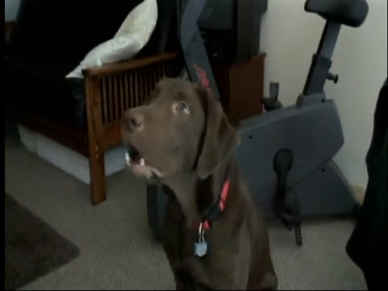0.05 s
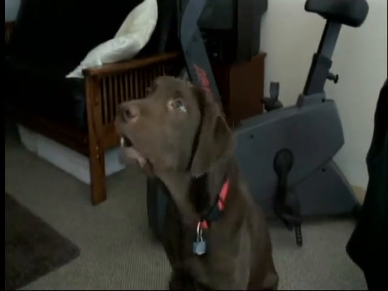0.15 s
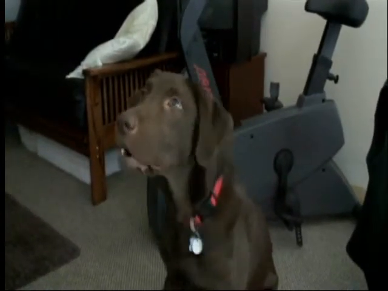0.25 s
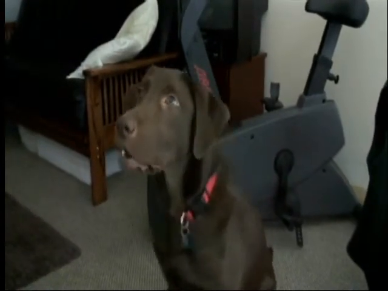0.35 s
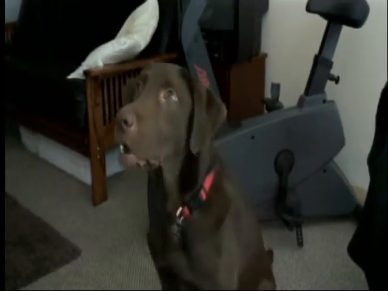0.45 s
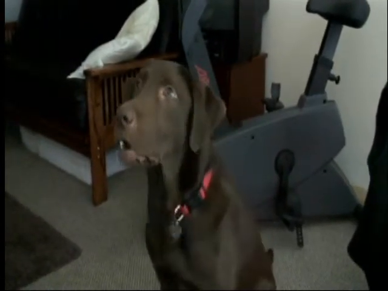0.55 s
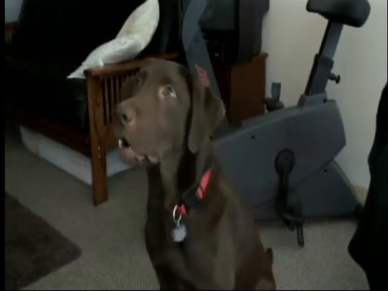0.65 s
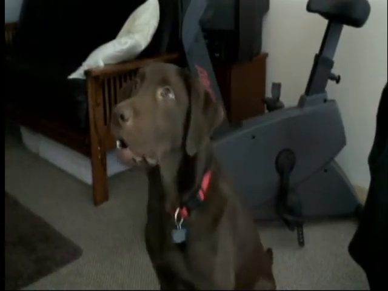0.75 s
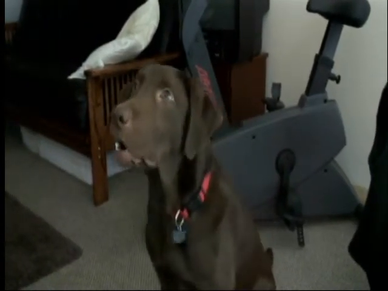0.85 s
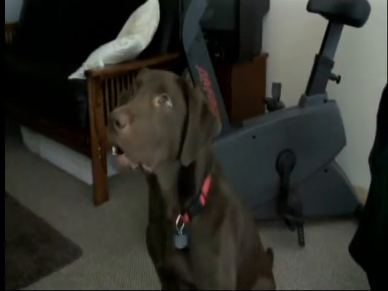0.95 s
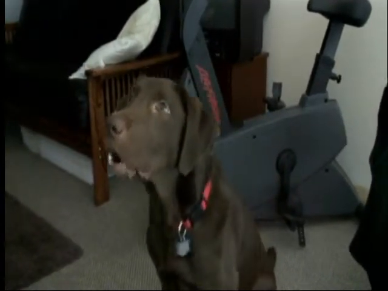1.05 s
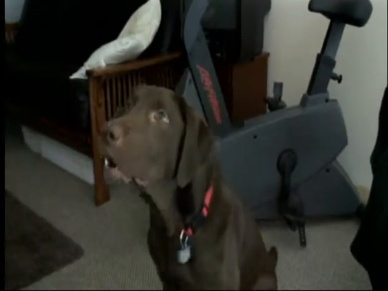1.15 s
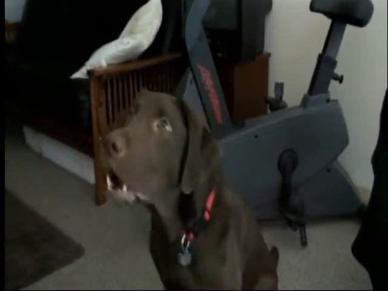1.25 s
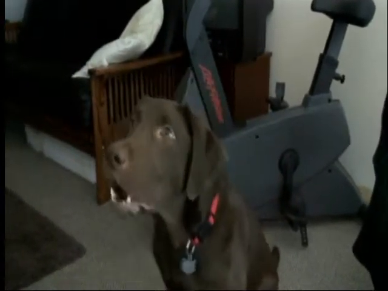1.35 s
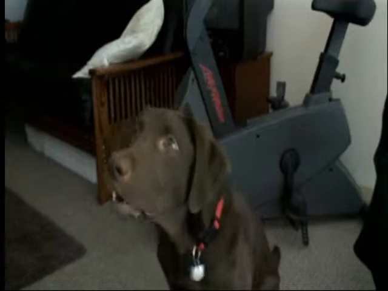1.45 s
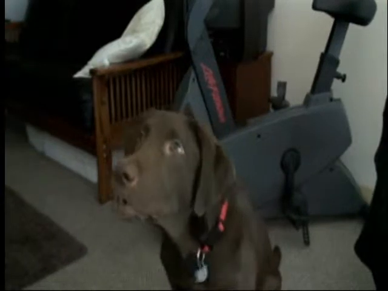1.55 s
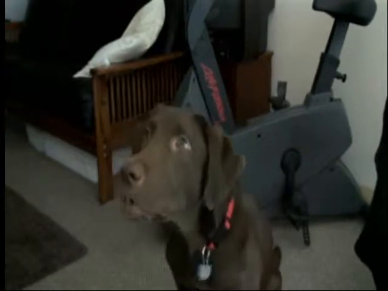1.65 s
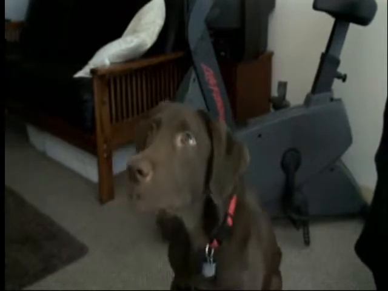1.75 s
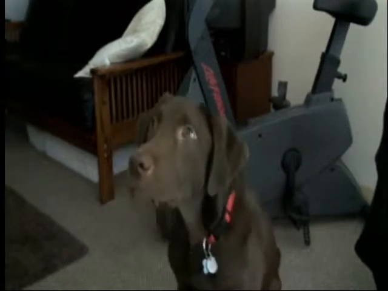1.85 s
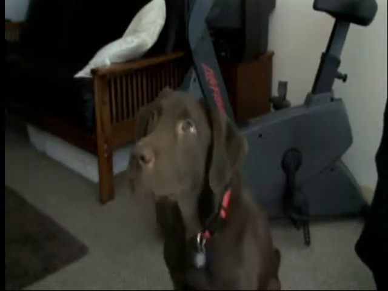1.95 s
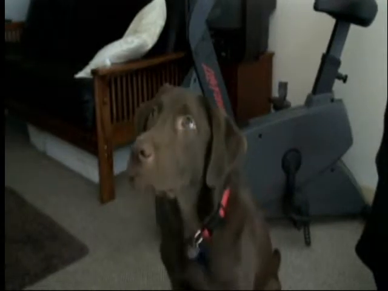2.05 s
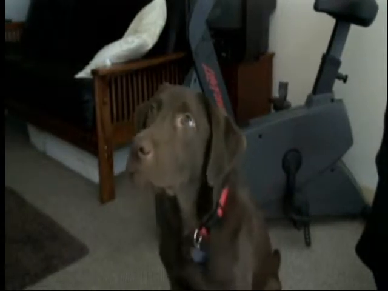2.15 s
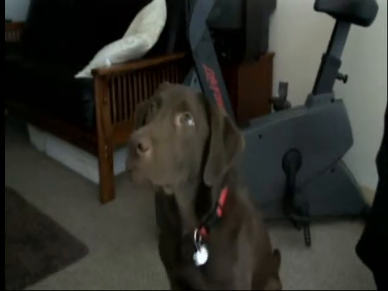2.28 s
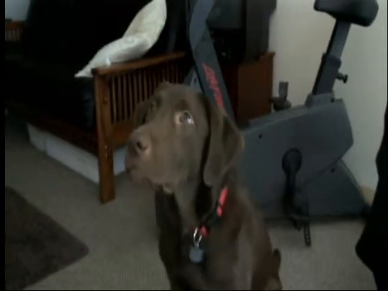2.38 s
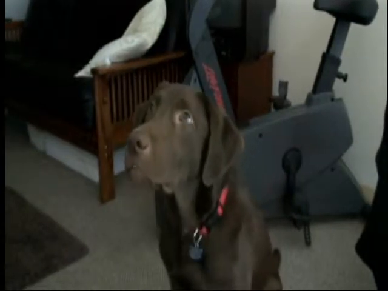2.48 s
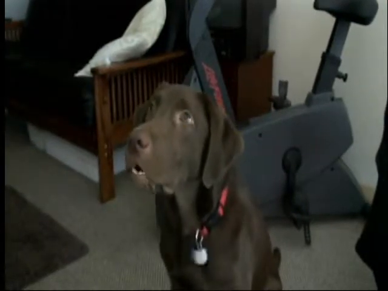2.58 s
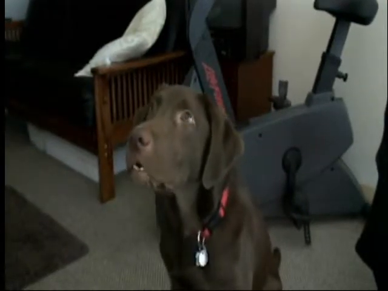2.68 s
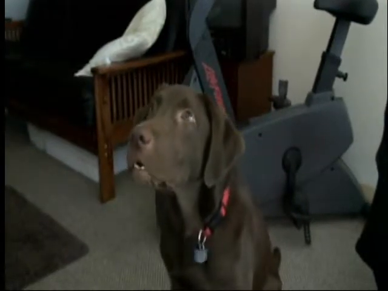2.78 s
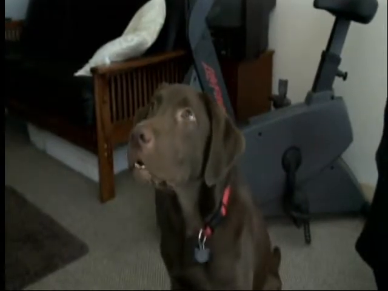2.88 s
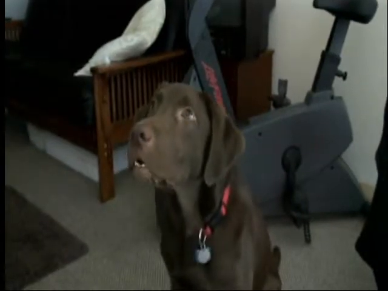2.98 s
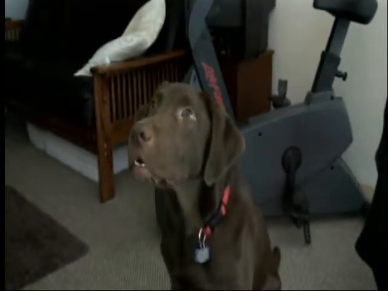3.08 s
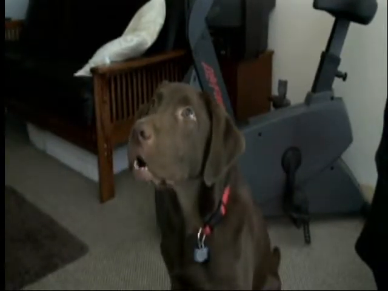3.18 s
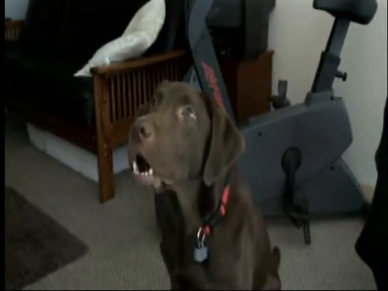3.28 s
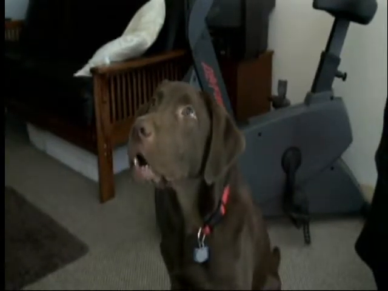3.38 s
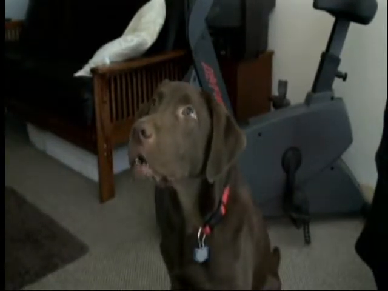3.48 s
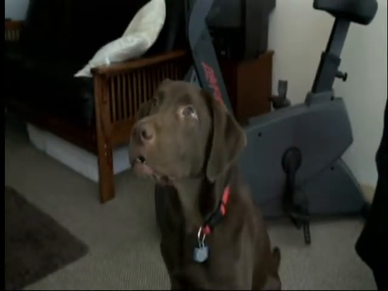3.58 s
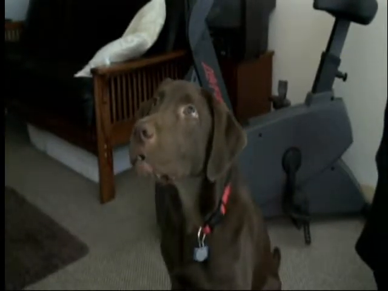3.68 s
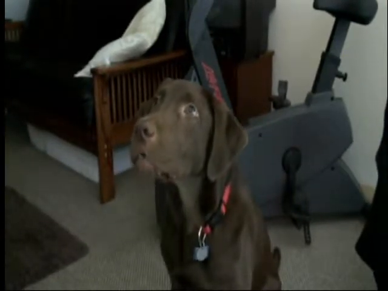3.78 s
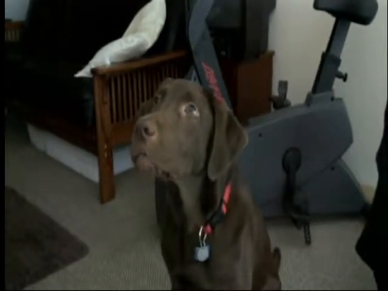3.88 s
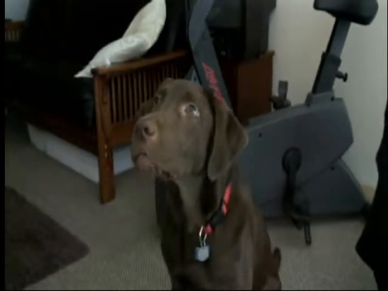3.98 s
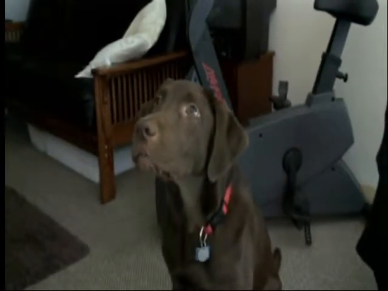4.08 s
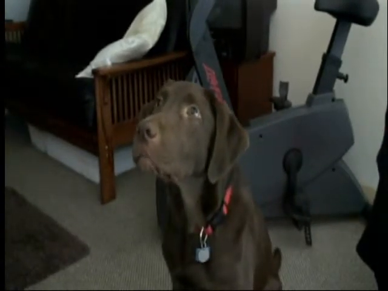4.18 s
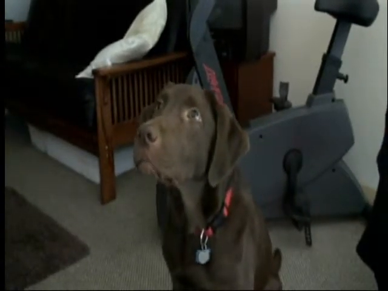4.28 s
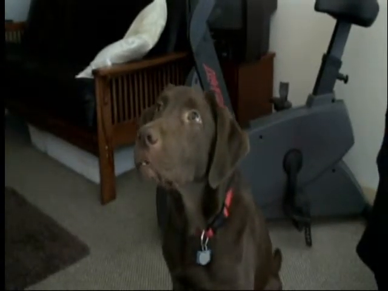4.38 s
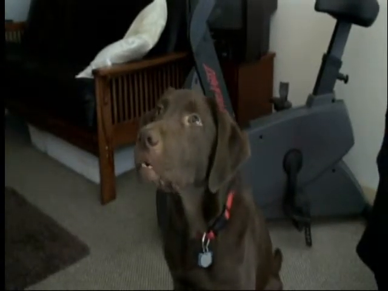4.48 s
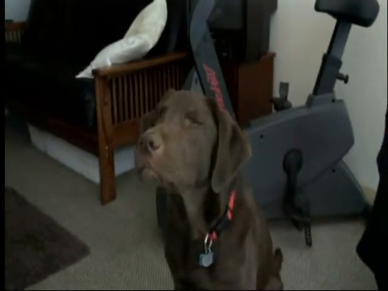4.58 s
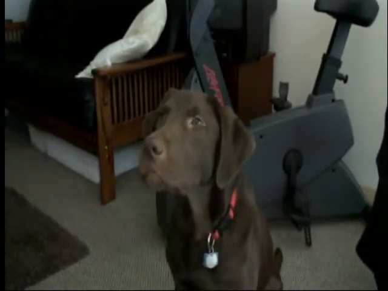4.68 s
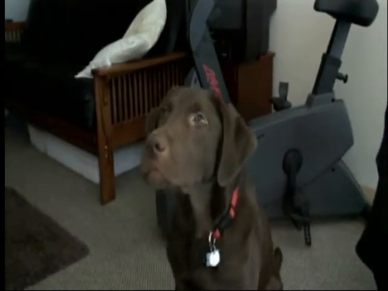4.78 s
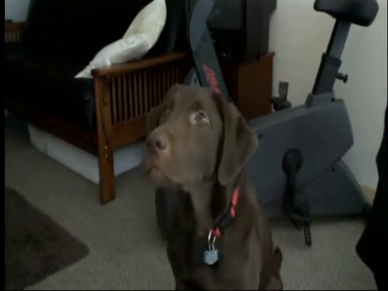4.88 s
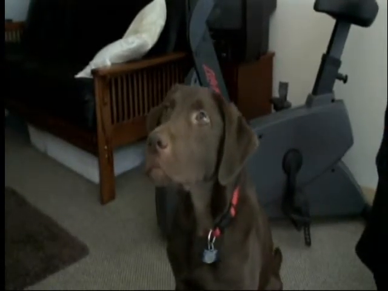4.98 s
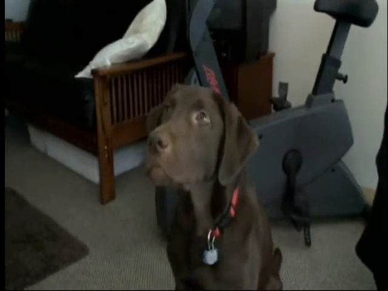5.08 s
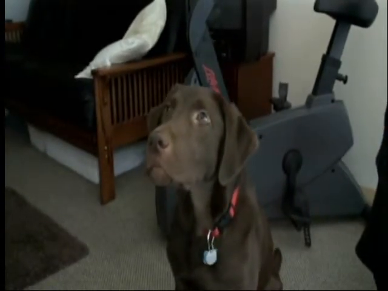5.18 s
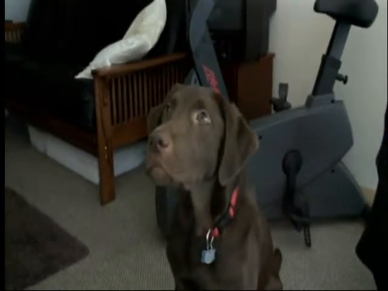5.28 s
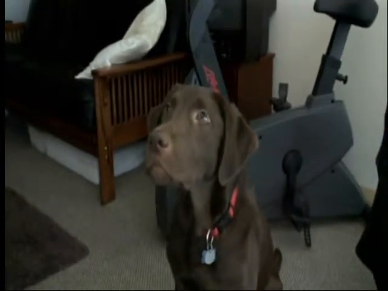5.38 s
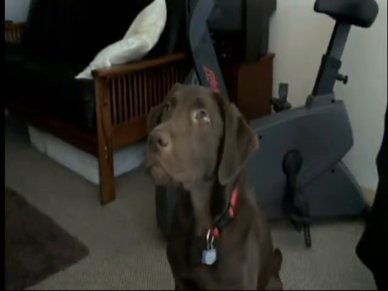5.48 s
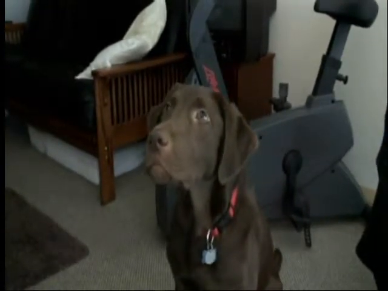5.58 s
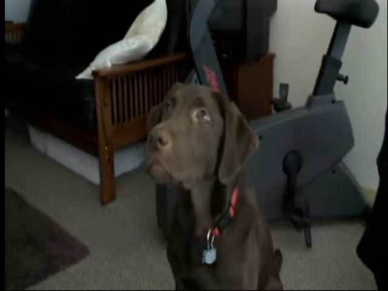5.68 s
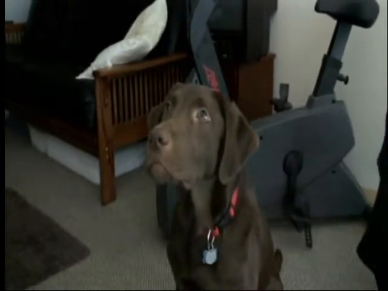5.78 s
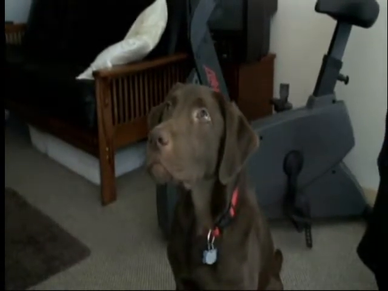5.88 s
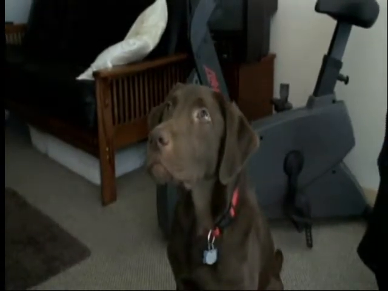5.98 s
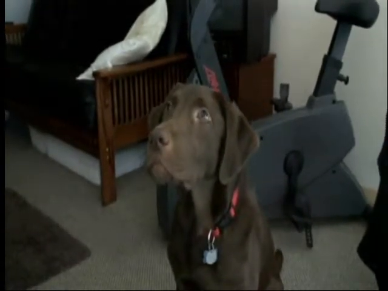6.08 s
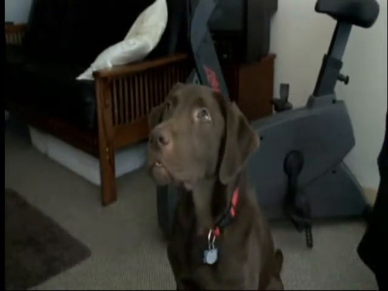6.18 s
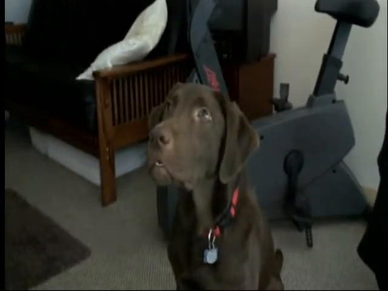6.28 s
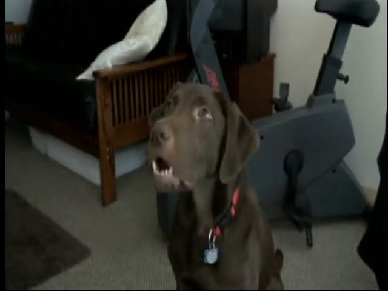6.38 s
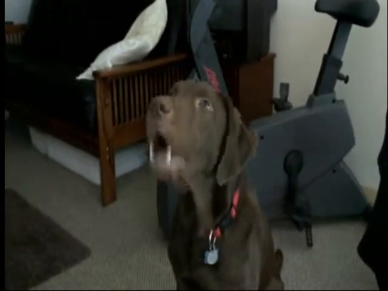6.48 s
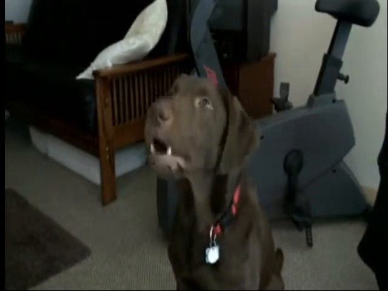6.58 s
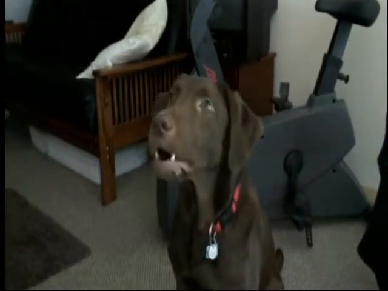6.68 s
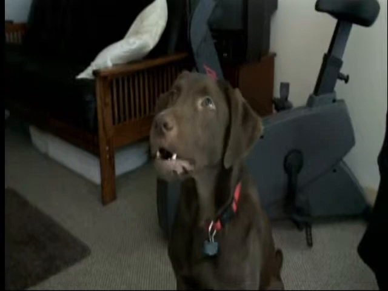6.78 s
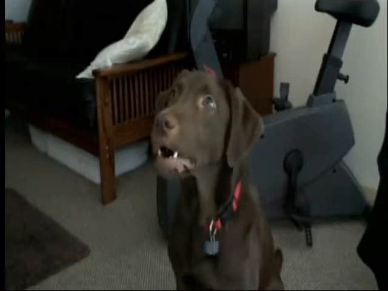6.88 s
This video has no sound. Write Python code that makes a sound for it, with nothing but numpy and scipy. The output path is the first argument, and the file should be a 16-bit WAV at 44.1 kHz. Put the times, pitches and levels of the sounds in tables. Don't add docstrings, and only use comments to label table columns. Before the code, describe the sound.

Indoors, a dog sits close to a thin, hissy microphone. It puffs and smacks its lips while metal collar tags tinkle, then a long breath whistles through the nostrils and turns raspy. One loud hoarse bark rings in the room. After a quieter pause come nasal peeps and soft closed-mouth whines, then a second, higher bark ending with a sharp jaw snap.

```python
import sys
import numpy as np
from scipy import signal
from scipy.fft import rfft, irfft
from scipy.io import wavfile
from scipy.ndimage import minimum_filter1d

SR = 44100
rng = np.random.default_rng(int(sys.argv[2]) if len(sys.argv) > 2 else 0)


def put_to_file(sound):
    columns = np.atleast_2d(sound).T
    safe = np.clip(columns, -1, 1)
    whole_steps = np.round(safe * 32767)
    wavfile.write(sys.argv[1], SR, whole_steps.astype(np.int16))


def how_loud(loudness_db):
    steps = np.asarray(loudness_db, float) / 20
    return 10 ** steps


N = 306054
T = np.arange(N) / SR

# (frequency [Hz], density [dB per Hz])
HISS_SPECTRUM = [(12, -36.5), (20, 4), (129, -2.5), (234, -5), (332, -3), (459, -3.5), (747, 4.5),
                 (1390, -10.5), (2520, -13.5), (3390, -17), (4570, -15.5), (4950, -16), (7430, -10),
                 (10300, -17), (12800, -21), (16600, -57), (22000, -120)]
# (frequency [Hz], density [dB per Hz])
HISS_SIDE_SPECTRUM = [(12, -34), (20, -4.5), (332, -19), (472, -22), (708, -23.5), (5670, -30.5),
                      (11400, -39), (12800, -20), (16600, -65), (22000, -120)]
HISS_DB, HISS_SIDE_DB, LEFT_LOWS = -51, -60, 0.17

# (frequency [Hz], t60 [s])
ROOM_DECAY = [(300, 0.72), (800, 0.51), (2000, 0.52), (5000, 0.47), (10000, 0.61)]
# (frequency [Hz], level [dB], t60 [s])
STANDING_WAVES = [(727, 25, 0.66), (866, 27, .4), (1110, 20.5, .4), (4330, 28, .6)]
ROOM_DB, ROOM_SIDE_DB = -11, -63.5
ROOM_TILT_DB, ECHO_BUILD_S = -3.5, .02

# (time [s], peak [dB], then modes near 10.4, 8.4 and 12.5 kHz against it [dB])
TAG_STRIKES = [(0.4763, -41, -13, -12, -30), (0.5387, -19.5, -22, -7, -3), (0.672, -39.5, -4, -7, -30),
               (0.7622, -29, -7, -33, -20), (0.8346, -25.5, -28, -14, -26), (0.857, -30, 0.5, -18, -30),
               (0.8824, -19.5, -15, -33, -24), (2.144, -36, 0, -7, -24), (2.483, -26.5, -8, -18, -23),
               (2.6569, -35.5, -27, -30, -26)]
# (frequency [Hz], level [dB], t60 [s])
TAG_MODES = [(10370, 6, 0.053), (8428, 3, 0.28), (12440, -17, .3), (10510, -13, 0.24), (9120, -6.5, 0.16),
             (9195, -3, 0.16), (5750, -18.5, 0.1), (10650, -21, .09)]
RATTLES, RATTLE_S, RATTLE_DB = 4, .02, -11

# (time [s], peak [dB], pitch [Hz], snap [dB])
LIP_SMACKS = [(0.369, -58, 1920, -3), (1.131, -42.5, 730, -7.5), (1.311, -31.5, 777, -12),
              (2.087, -47, 785, -11), (2.486, -50, 740, -0.5), (2.862, -34, 777, -14),
              (3.679, -33, 640, -11.5), (4.667, -42, 640, -30), (5.559, -56, 1490, -6),
              (5.829, -53, 580, -13), (5.843, -58, 2060, -2), (6.614, -28.5, 810, -12),
              (6.825, -21.5, 755, -14)]
POP_T60_S, POP_RISE_S, SNAP_TOP_HZ = 0.017, .0015, 1920
JAW_S, JAW_DB = 6.8389, -15
GULP_S, GULP_LENGTH_S, GULP_HZ, GULP_DB = 6.825, 0.013, 820, -12.5

# (time [s], pitch [Hz], level [dB])
LONG_WHISTLES = [
    [(1.72, 4620, -55), (1.75, 4960, -73), (1.79, 5270, -56), (1.845, 5240, -45), (1.87, 5370, -65),
     (1.93, 5410, -44), (2.05, 5170, -45.5), (2.085, 5050, -48), (2.115, 4780, -50)],
    [(2.13, 4980, -51), (2.2, 4950, -54.5), (2.25, 4800, -51), (2.31, 4800, -52), (2.35, 4920, -58),
     (2.44, 4810, -59)],
    [(4.745, 4500, -69), (4.765, 4730, -56.5), (4.805, 4560, -54), (4.84, 4710, -52), (4.895, 4860, -56),
     (4.935, 4670, -58), (5.04, 5100, -61), (5.15, 5470, -65), (5.29, 5420, -66)],
    [(6.265, 5130, -56), (6.3, 5200, -55.5), (6.368, 5530, -60), (6.4, 5520, -51), (6.532, 5520, -58.5),
     (6.58, 5500, -83)],
]
LONG_WHISTLE_OVERTONES = [-42, 2.5, -20, -20]
# (time [s], length [s], first pitch [Hz], last pitch [Hz], level [dB])
SHORT_PEEPS = [(.369, 0.0099, 5000, 5150, -47), (.381, 0.056, 5150, 5120, -53),
               (0.45, 0.029, 4250, 4100, -59), (0.49, .022, 4750, 4800, -54),
               (0.516, 0.014, 4220, 4250, -47), (3.397, 0.066, 4870, 4950, -53),
               (0.456, 0.018, 5570, 5460, -56), (0.54, 0.013, 4800, 4650, -55),
               (1.148, 0.03, 4600, 4870, -57), (1.231, 0.047, 4800, 4270, -57),
               (2.689, 0.045, 9130, 9280, -49.5), (2.722, 0.027, 9900, 10050, -52),
               (2.652, 0.019, 9600, 9620, -51), (2.861, 0.0095, 4270, 4180, -47),
               (0.463, 0.074, 9700, 9600, -52), (5.394, 0.024, 5500, 5520, -52),
               (2.726, 0.058, 5000, 5150, -63.5), (5.55, .12, 5400, 5080, -56),
               (6.096, 0.17, 4940, 4900, -58.5), (6.201, 0.059, 4160, 4700, -43.5),
               (1.897, 0.19, 5750, 6180, -57), (5.305, .05, 5330, 5380, -62.5),
               (5.333, 0.033, 4530, 4900, -53), (5.386, 0.039, 4270, 4200, -45.5),
               (5.428, 0.018, 4200, 4180, -43.5), (5.552, 0.017, 4300, 4200, -37.5),
               (5.643, 0.02, 4640, 4600, -55), (5.651, 0.022, 4540, 4570, -37),
               (5.835, 0.027, 4370, 4475, -44), (6.092, 0.026, 4420, 4300, -49),
               (6.254, 0.031, 4670, 4610, -45)]
PEEP_EDGE_DB, PEEP_EDGE_SHARE, PEEP_OVERTONE_DB = -3, 0.15, -24

# (time [s], flow [dB], share through the nose [0-1])
LONG_BREATHS = [
    [(1.764, -68, 0.83), (1.838, -52.5, 0.16), (2.098, -49, 0.24), (2.16, -51, 0.46), (2.63, -52.5, 0.76),
     (2.744, -64.5, 0.96), (2.838, -81, 0.4)],
    [(4.728, -74, 0.7), (4.782, -63.5, 0.71), (5.15, -62.5, 0.81), (5.38, -52, 0.63), (5.894, -52, 0.7),
     (6.148, -57.5, 0.63), (6.245, -51, 0.85), (6.32, -66, 0.82), (6.6, -70, 0.75)],
]
# (time [s], flow [dB], rise [s], fall [s], share through the nose [0-1])
NOSE_SNORTS = [(0.28, -55, 0.069, 0.16, 0.1), (0.55, -49, 0.55, 0.18, 0.42),
               (0.878, -60.5, 0.19, 0.32, 0.2), (1.614, -64, .1, 0.057, 0.2), (3.262, -56, 0.33, 0.24, 0.1),
               (3.372, -62, 0.0038, 0.015, 1.33), (3.5, -44, .01, 0.11, 0.2),
               (3.583, -55.5, 0.046, 0.12, 0.81), (6.62, -48, 0.0128, .01, 0.68),
               (6.759, -43.5, 0.011, 0.13, 0.2), (6.837, -53, 0.0064, 0.04, 0.8),
               (6.94, -56.5, 0.1, .01, 0.69)]
# (nose shut off [dB], all air through it [dB])
AIR_PATH_LEVELS = [(-0.5, -12.5), (-14.5, 10.5), (4, -0.6), (-10.5, 1)]
# (frequency [Hz], width [Hz], level [dB])
PHARYNX_CAVITIES = [(3410, 140, 0), (3605, 400, 1)]
# (frequency [Hz], width [Hz], level [dB])
NOSE_CAVITIES = [(4200, 74, 27), (4370, 430, 37), (4460, 260, 28), (4800, 220, 20.5)]
# (frequency [Hz], width [Hz], level [dB])
UPPER_CAVITIES = [(6060, 1600, 2), (7266, 410, 6.5), (8200, 400, -45)]
# (frequency [Hz], width [Hz], level [dB])
TOP_CAVITIES = [(9200, 600, -3), (9800, 500, 0), (10350, 400, -2)]
NOSE_FLUTTER_DB = 3
# time [s], level [dB], rise [s], fall [s]
RASP, RASP_HZ, RASP_WIDTH_HZ = (2.5, -56, 0.8, 0.8), 3780, 160

# (time [s], level [dB], rise [s], fall [s], mouth open [0-1])
MOUTH_HUFFS = [
    (0.118, -41, 0.14, 0.09, 0.05),
    (0.26, -44, 0.16, 0.05, 0.17),
    (0.291, -35.5, 0.057, 0.056, 0.84),
    (0.34, -53, 0.04, 0.028, 0),
    (1.599, -44.5, 0.049, 0.046, 0.96),
]
# (frequency [Hz], density [dB per Hz])
HUFF_SPECTRUM = [(210, -61), (350, -20), (552, -4), (771, -23.5), (891, -9), (1100, -18), (1630, -7),
                 (2320, -15.5), (3200, -15), (5000, -72), (6500, -69), (11000, -120)]
# (frequency [Hz], width [Hz], level [dB])
OPEN_MOUTH = [(600, 154, 3.5), (880, 30, 4.5), (1310, 140, 0), (1684, 330, -6), (2130, 73, -3.5),
              (2610, 65, -5), (3200, 120, -27)]
# (frequency [Hz], width [Hz], level [dB])
SHUT_CHEEKS = [(600, 120, 0), (875, 140, -6)]
SWELL_DB = 22

# (time [s], pitch [Hz], level [dB], nasal overtones [dB])
SOFT_WHINES = [
    [(5.335, 687, -86, -60), (5.352, 678, -43, -50), (5.38, 614.5, -39, -35), (5.422, 600, -43, -45),
     (5.445, 580.4, -37.5, -36), (5.5, 568.4, -34.5, -44), (5.54, 563, -47, -36), (5.575, 599, -70, -39)],
    [(5.655, 562.4, -54, -55), (5.68, 534, -37, -42), (5.715, 525, -46.5, -37.5),
     (5.755, 553.5, -40.5, -47), (5.772, 532.6, -47, -38.5), (5.79, 504, -38, -47), (5.835, 501, -49, -48),
     (5.855, 537, -51, -55)],
    [(5.86, 505, -49, -44), (5.88, 500, -42, -47), (5.914, 495, -45, -47), (5.955, 512, -40.5, -51),
     (6.0, 526, -54.5, -46), (6.05, 509.3, -40, -44), (6.09, 517.5, -43.5, -50), (6.115, 530, -69, -65)],
    [(6.205, 530, -66, -60), (6.222, 549, -55, -61), (6.262, 579, -42, -44), (6.295, 583, -72, -48)],
]
# (frequency [Hz], level [dB])
CLOSED_THROAT = [(450, -6), (700, 16), (1050, -12.5), (1300, -16.5), (1550, -32.5), (2100, -18),
                 (2700, -63), (3500, -17), (4200, -7.5), (4560, -1.5), (4800, -11.5), (5300, -42)]
NASAL_SWELL_DB, NASAL_HOARSE = 3.5, .2

# (time [s], pitch [Hz], effort [dB])
BARK_CALLS = [
    [(3.370, 705, -53), (3.378, 721, -17), (3.395, 747.4, -13.5), (3.476, 761.4, -3), (3.488, 623, -8),
     (3.503, 697, -13), (3.534, 541.4, -17), (3.566, 501, -26), (3.625, 345.5, -41.5)],
    [(6.622, 794, -43), (6.633, 810, -5.5), (6.643, 749, -11.5), (6.668, 863, 1.5), (6.72, 880, 1),
     (6.733, 798, -7.5), (6.751, 586, -21.5), (6.774, 500, -24.5), (6.86, 450, -42)],
]
# (frequency [Hz], level [dB])
BARK_THROATS = [
    [(300, -16), (500, 14.5), (760, 5), (1250, 2), (1520, -5), (2000, -10.5), (2300, -20), (3000, -25.5),
     (3800, -36), (4500, -30.5), (5300, -32), (7600, -28), (10500, -45), (13000, -86)],
    [(400, -7.5), (600, -18.5), (870, -4), (1200, -4.5), (1730, -22.5), (2600, -29.5), (3450, -42),
     (4050, -40), (4330, -27), (4700, -45.5), (6000, -45.5), (7700, -36.5), (10000, -54), (13000, -102)],
]
BARK_ROOM_LEVELS = [-18.5, -15.5]
# (nose hiss [dB], upper hiss [dB])
BARK_AIR_LEVELS = [(-56, -50), (-44, -36)]
HOARSE = [.007, .055]
BREAKUP, BRIGHTEN = 1.2, .2
SMEAR_SPREAD = 1.15
WAVER, WAVER_PER_HOARSE = .002, 12

# (frequency [Hz], level [dB])
WEAKEST_KEPT = [(300, -130), (2200, -118), (3200, -104), (9800, -104), (10800, -98), (11500, -93),
                (12300, -90), (13000, -89)]
QUIET_DB, KEPT_FOLLOWS, KEPT_CHANCE_DB = -56, .745, 2.2
BASS_WEIGHT_DB, BASS_HZ = -7.5, 2500
MIC_LOW_HZ, LIMIT_DB, RELEASE_DB_PER_S, HISS_DUCK = 461, -7, 460, 0.28


def rms_one(x):
    return x / np.sqrt(np.mean(x ** 2) + 1e-20)


def in_time(rows):
    s, *columns = np.transpose(rows)
    span = slice(int(s[0] * SR), min(N, int(s[-1] * SR)))
    fade = np.clip(np.minimum(T[span] - s[0], s[-1] - T[span]) / .004, 0, 1)
    return span, fade, [np.interp(T[span], s, c) for c in columns]


def swell(peak_s, level_db, rise_s, fall_s, *steady):
    low_db = level_db - SWELL_DB
    return [(peak_s - rise_s, low_db, *steady), (peak_s, level_db, *steady), (peak_s + fall_s, low_db, *steady)]


def at_hz(points, hz):
    points_hz, values = np.transpose(points)
    return np.interp(np.log(hz), np.log(points_hz), values)


def lowpass(x, top_hz, order):
    return signal.sosfilt(signal.butter(order, top_hz, fs=SR, output="sos"), x)


def drift(rate_hz, size=N):
    r = np.exp(-2 * np.pi * rate_hz / SR)
    settle = SR // 4
    return rms_one(signal.lfilter([1], [1, -2 * r, r * r], rng.standard_normal(size + settle))[settle:])


def coloured(spectrum):
    hz = np.arange(N // 2 + 1) * SR / N + 1
    return rms_one(irfft(rfft(rng.standard_normal(N)) * how_loud(at_hz(spectrum, hz)), N))


def cavities(resonances, flutter_db):
    out = 0
    for hz, width, level_db in resonances:
        r = np.exp(-1.5 * np.pi * width / SR)
        a = [1, -2 * r * np.cos(2 * np.pi * hz / SR), r * r]
        band = signal.lfilter([1, 0, -1], a, rng.standard_normal(N))
        band = signal.lfilter([1, 0, -1], a, band)
        out = out + rms_one(band) * how_loud(level_db + flutter_db * drift(41))
    return rms_one(out)


def ring(clicks, hz, t60):
    r, w = how_loud(-60 / (t60 * SR)), 2 * np.pi * hz / SR
    return signal.lfilter([0, np.sin(w)], [1, -2 * r * np.cos(w), r * r], clicks + 1e-18)


def voice(pitch, hoarse, throat, jitter, orders, spread=0.19, tilt_db=0, patchy_db=0):
    size, room_for = len(pitch), SR * 2 // 3
    unsteady = pitch * (1 + jitter * drift(82, size=room_for)[:size])
    phase = 2 * np.pi * np.cumsum(unsteady) / SR
    out = 0
    for k in orders:
        smear = np.clip(hoarse * (k - .6) ** spread, 0, 1)
        shake = 8 * lowpass(rng.standard_normal((2, room_for)), 350, order=4)[:, :size]
        patch_db = patchy_db * np.log2(k) * drift(8.5, size=room_for)[:size]
        tone, turned = np.sin(k * phase), np.cos(k * phase)
        noisy = (shake[0] * tone + shake[1] * turned) / 2 ** .5
        wave = np.sqrt(1 - smear ** 2) * tone + smear * noisy
        throat_db = at_hz(throat, k * pitch) - at_hz(throat, pitch)
        out = out + how_loud(throat_db + tilt_db * np.log2(k) + patch_db) * wave
    return -2 ** .5 * out


def hiss():
    side = how_loud(HISS_SIDE_DB) * coloured(HISS_SIDE_SPECTRUM)
    return how_loud(HISS_DB) * coloured(HISS_SPECTRUM) + side * [[1 + LEFT_LOWS], [LEFT_LOWS - 1]]


def room(x):
    t, edges = T[:SR], 200 * 2 ** np.arange(0, 6.1, .5)
    build = np.clip((t - .006) / ECHO_BUILD_S, 0, 1)
    echo = 0
    for low, high in zip(edges, edges[1:]):
        half_octave = signal.butter(2, [low, high], "band", fs=SR, output="sos")
        band = signal.sosfilt(half_octave, rng.standard_normal((2, SR)))
        decay = how_loud(-60 * t / at_hz(ROOM_DECAY, np.sqrt(low * high)))
        echo = echo + band * decay * how_loud(ROOM_TILT_DB * np.log2(low / 800)) * build
    echo = echo / np.sqrt(np.sum(echo[0] ** 2))
    mid, side = signal.fftconvolve(x[None], echo, axes=1)[:, :N]
    for hz, level_db, t60 in STANDING_WAVES:
        mid = mid + how_loud(level_db) * ring(x, hz, t60) / (t60 * SR)
    return mid + how_loud(ROOM_SIDE_DB) * side * [[1], [-1]]


def tags():
    s, peak_db, *own_db = np.transpose(TAG_STRIKES)
    at = np.round(s * SR).astype(int)
    chance = rng.standard_normal((len(s), len(TAG_MODES)))
    delay_s = rng.uniform(.05, 1, (len(s), RATTLES)) * RATTLE_S
    later = at[:, None] + (delay_s * SR).astype(int)

    def touches(strike_db):
        clicks = np.zeros(N)
        clicks[at] = how_loud(strike_db)
        clicks[later] = clicks[at][:, None] * how_loud(RATTLE_DB) * rng.standard_normal(later.shape)
        return clicks

    out = np.zeros(N)
    for k, (hz, level_db, t60) in enumerate(TAG_MODES):
        mode_db = own_db[k] if k < len(own_db) else 0.69 * chance[:, k]
        contact = ring(touches(peak_db + level_db + mode_db), hz, 0.0021) / 16
        out += ring(contact, hz, t60)
    tick = ring(touches(peak_db - 9), 7600, 0.0063)
    return out + tick


def smacks():
    out, t = np.zeros(N), T[:SR // 10]
    rise = np.clip(t / POP_RISE_S, 0, 1)
    for s, peak_db, hz, snap_db in LIP_SMACKS:
        modes = [(1, 6.5), (1.54, 3.5), (2.48, -6.5)]   # (ratio to the pitch, dB)
        pop = sum(how_loud(db) * np.sin(2 * np.pi * hz * ratio * t) for ratio, db in modes)
        pop = pop * how_loud(-60 * t / POP_T60_S)
        snap = rms_one(lowpass(rng.standard_normal(len(t)), SNAP_TOP_HZ, order=2))
        snap = snap * how_loud(snap_db - 60 * t / 0.097)
        i = round(s * SR)
        out[i:i + len(t)] += how_loud(peak_db) * (pop + snap) * rise
    i = round(JAW_S * SR)
    jaw = how_loud(JAW_DB - 60 * t / 0.0012) * np.cos(2 * np.pi * 3500 * t)
    out[i:i + len(t)] += jaw[:N - i]
    gulp = np.sin(np.pi * np.clip((T - GULP_S) / GULP_LENGTH_S, 0, 1)) ** .5
    return out + how_loud(GULP_DB) * gulp * np.sin(2 * np.pi * GULP_HZ * T)


def whistle():
    out, wobble, flicker = np.zeros(N), .003 * drift(40), how_loud(3 * drift(25))
    steps = [(0, PEEP_EDGE_DB), (PEEP_EDGE_SHARE, 0), (1 - PEEP_EDGE_SHARE, 0), (1, PEEP_EDGE_DB)]
    peeps = []
    for s, length, first, last, db in SHORT_PEEPS:
        peeps.append([(s + a * length, first + a * (last - first), db + edge) for a, edge in steps])
    overtones_db = LONG_WHISTLE_OVERTONES + [PEEP_OVERTONE_DB] * len(peeps)
    for rows, over_db in zip(LONG_WHISTLES + peeps, overtones_db):
        span, fade, (pitch, level_db) = in_time(rows)
        phase = 2 * np.pi * np.cumsum(pitch * (1 + wobble[span])) / SR
        tone = np.sin(phase) + how_loud(over_db) * np.sin(2 * phase)
        out[span] += 2 ** .5 * fade * how_loud(level_db) * flicker[span] * tone
    return out


def breath():
    out = np.zeros(N)
    layers = [cavities(PHARYNX_CAVITIES, flutter_db=4.5), cavities(NOSE_CAVITIES, NOSE_FLUTTER_DB),
              cavities(UPPER_CAVITIES, flutter_db=2.5), cavities(TOP_CAVITIES, flutter_db=1.5)]
    for rows in LONG_BREATHS + [swell(*row) for row in NOSE_SNORTS]:
        span, fade, (flow_db, nasal) = in_time(rows)
        for (shut_db, open_db), layer in zip(AIR_PATH_LEVELS, layers):
            path_db = shut_db + nasal * (open_db - shut_db)
            out[span] += fade * how_loud(flow_db + path_db) * layer[span]
    span, fade, (rasp_db,) = in_time(swell(*RASP))
    out[span] += fade * how_loud(rasp_db) * cavities([(RASP_HZ, RASP_WIDTH_HZ, 0)], flutter_db=1.5)[span]
    for rows in SOFT_WHINES:
        span, fade, _ = in_time(rows)
        out[span] *= how_loud(-8 * fade)
    return out


def huffs():
    out = np.zeros(N)
    puff = (coloured(HUFF_SPECTRUM) + 1.1 * cavities(OPEN_MOUTH, flutter_db=4)) * how_loud(3 * drift(60))
    muffled = cavities(SHUT_CHEEKS, flutter_db=3.5)
    for row in MOUTH_HUFFS:
        span, fade, (level_db, wide) = in_time(swell(*row))
        out[span] += fade * how_loud(level_db) * (wide * puff[span] + (1 - wide) * muffled[span])
    return out


def whine():
    out = np.zeros(N)
    for rows in SOFT_WHINES:
        span, fade, (pitch, level_db, nasal_db) = in_time(rows)
        low = how_loud(level_db) * voice(pitch, 0.019, CLOSED_THROAT, jitter=0.0046, orders=range(1, 6))
        nasal = 0
        for k in range(6, 10):
            swelling = how_loud(NASAL_SWELL_DB * drift(12, size=SR // 2)[:len(pitch)])
            nasal = nasal + swelling * voice(pitch, NASAL_HOARSE, CLOSED_THROAT, jitter=0.0032, orders=[k])
        out[span] = fade * (low + how_loud(nasal_db) * nasal)
    return out


def barks():
    direct, sent = np.zeros(N), np.zeros(N)
    nose = cavities(NOSE_CAVITIES[1:2], flutter_db=2.5)
    upper = cavities(UPPER_CAVITIES + TOP_CAVITIES[:1], flutter_db=2.5)
    settings = zip(BARK_CALLS, HOARSE, BARK_THROATS, BARK_ROOM_LEVELS, BARK_AIR_LEVELS)
    for rows, held, throat, room_db, (nose_db, upper_db) in settings:
        span, fade, (pitch, effort_db) = in_time(rows)
        after_top = np.arange(len(pitch)) > pitch.argmax()
        hoarse = held + BREAKUP * (1 - pitch / pitch.max()) * after_top
        tilt_db = BRIGHTEN * (effort_db - effort_db.max())
        call = voice(pitch, hoarse, throat, jitter=WAVER + held / WAVER_PER_HOARSE, orders=range(1, 15),
                     spread=SMEAR_SPREAD, tilt_db=tilt_db, patchy_db=1.52)
        air = how_loud(nose_db) * nose[span] + how_loud(upper_db) * upper[span]
        direct[span] = fade * how_loud(effort_db) * (call + air)
        sent[span] = how_loud(room_db) * direct[span]
    return direct, sent


def scene():
    soft = tags() + smacks() + whistle() + breath() + huffs() + whine()
    direct, sent = barks()
    return direct + soft + room(sent + how_loud(ROOM_DB) * soft)


def limiter_gain(sound):
    crest = -minimum_filter1d(-np.abs(sound).max(axis=0), size=120)
    over_db = np.maximum(20 * np.log10(crest + 1e-9) - LIMIT_DB, 0)
    release_db = RELEASE_DB_PER_S * T
    held_db = np.maximum.accumulate(over_db + release_db) - release_db
    return how_loud(-signal.lfilter([.008], [1, -.992], held_db))


def thin_out(x):
    hz, s, frames = signal.stft(x, SR, nperseg=2048, noverlap=1024)
    power = np.abs(frames.mean(axis=0)) ** 2 + 1e-20
    weight = how_loud(2 * BASS_WEIGHT_DB * (hz < BASS_HZ))[:, None]
    loud_db = 10 * np.log10(np.sum(power * weight, axis=0) * 4 / 3)
    chance_db = KEPT_CHANCE_DB * drift(2)[np.minimum((s * SR).astype(int), N - 1)]
    bar_db = KEPT_FOLLOWS * np.maximum(loud_db - QUIET_DB, 0) + chance_db
    kept = 10 * np.log10(power) > at_hz(WEAKEST_KEPT, hz + 1)[:, None] + bar_db
    return signal.istft(frames * kept, SR, nperseg=2048, noverlap=1024)[1][:, :N]


def low_pass(x):
    return signal.sosfilt(signal.butter(12, 12900, fs=SR, output="sos"), x)


def record(dry):
    sound = signal.sosfilt(signal.butter(4, MIC_LOW_HZ, "high", fs=SR, output="sos"), dry)
    gain = limiter_gain(sound)
    mix = thin_out(gain * sound + gain ** HISS_DUCK * hiss())
    return low_pass(mix)


dry = scene()
out = record(dry)
put_to_file(out)
```